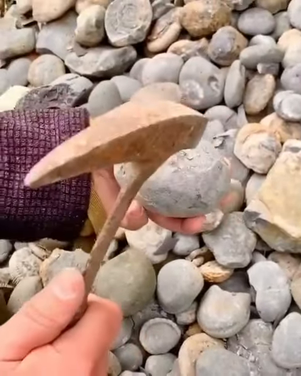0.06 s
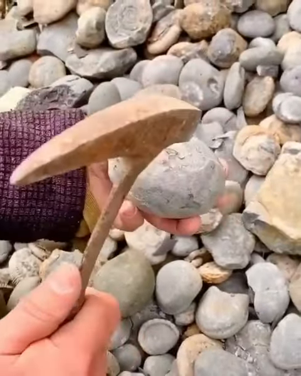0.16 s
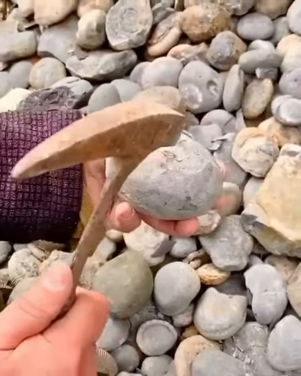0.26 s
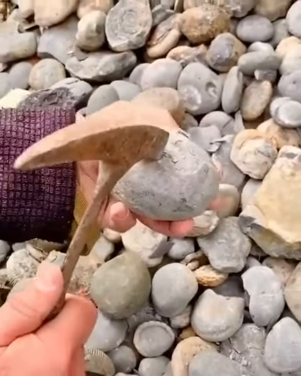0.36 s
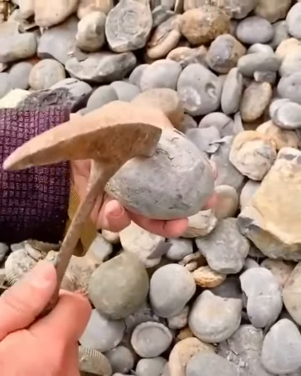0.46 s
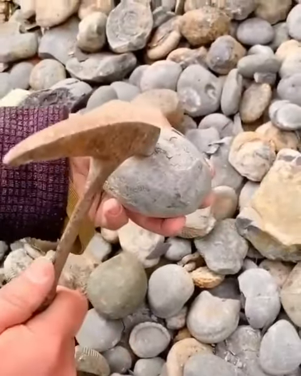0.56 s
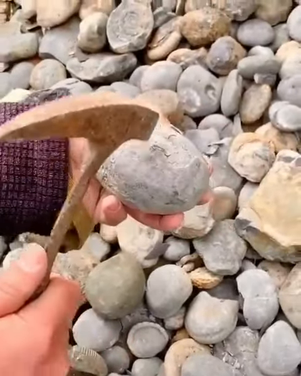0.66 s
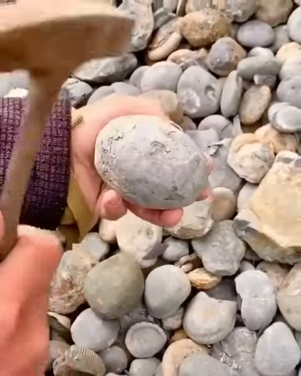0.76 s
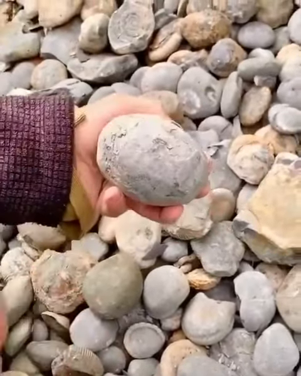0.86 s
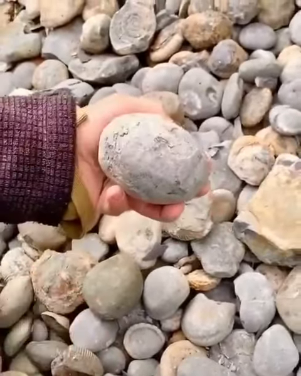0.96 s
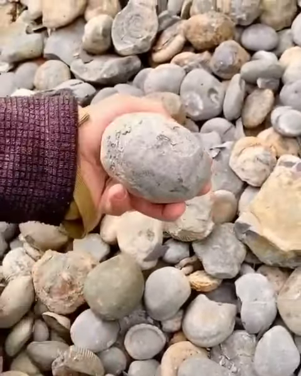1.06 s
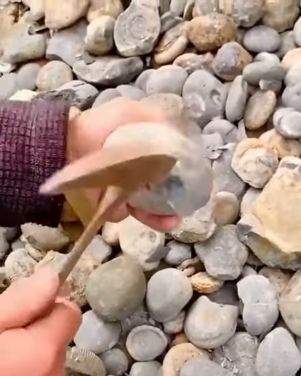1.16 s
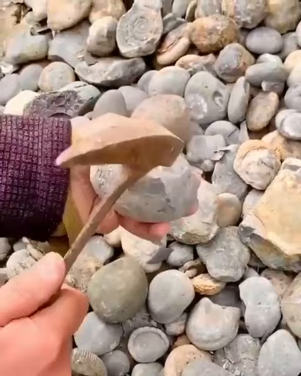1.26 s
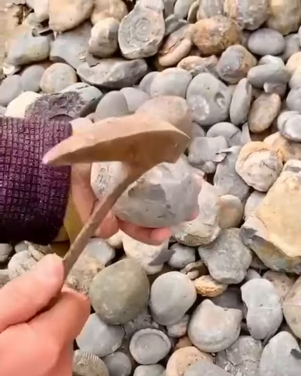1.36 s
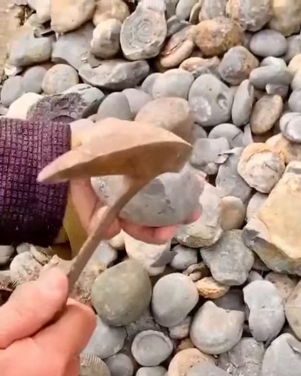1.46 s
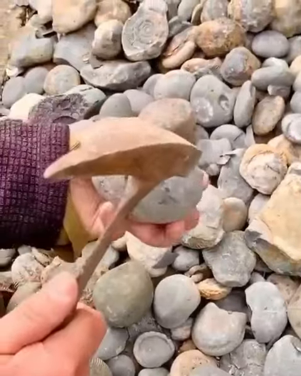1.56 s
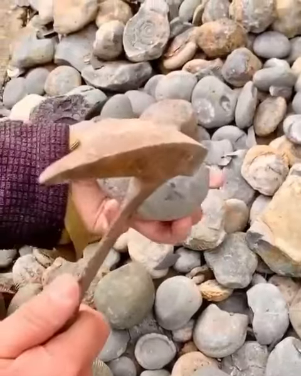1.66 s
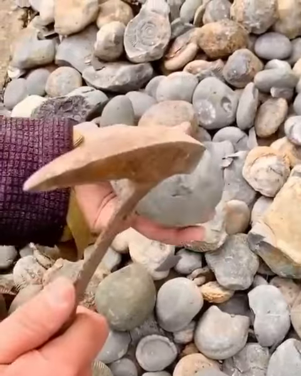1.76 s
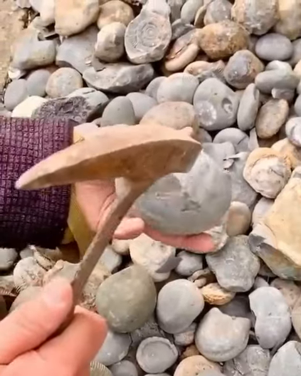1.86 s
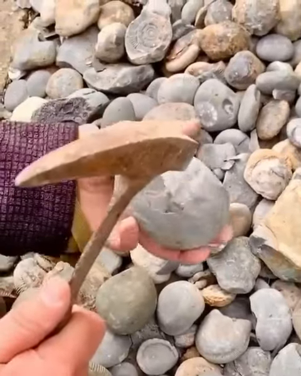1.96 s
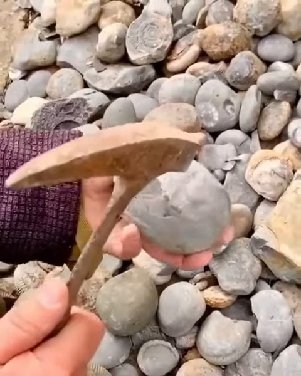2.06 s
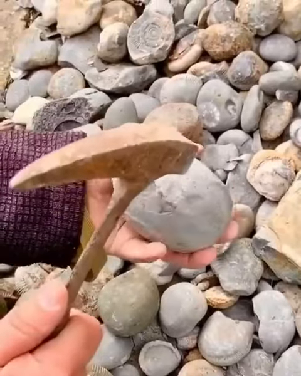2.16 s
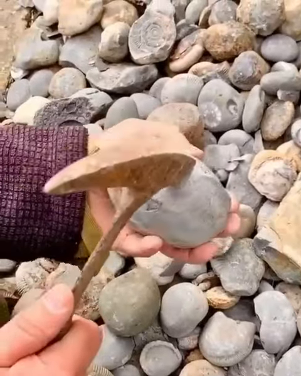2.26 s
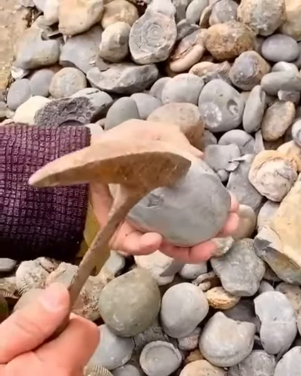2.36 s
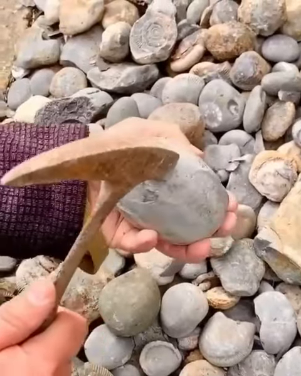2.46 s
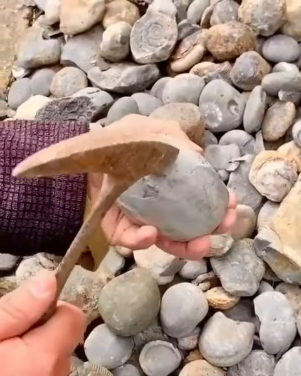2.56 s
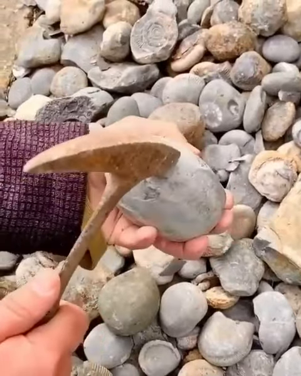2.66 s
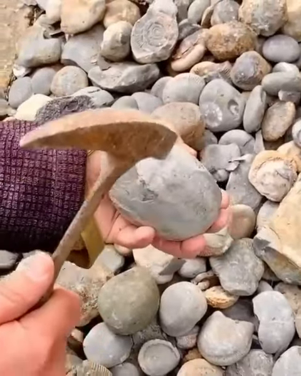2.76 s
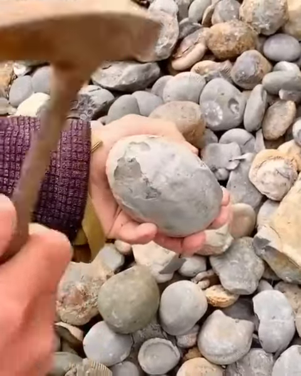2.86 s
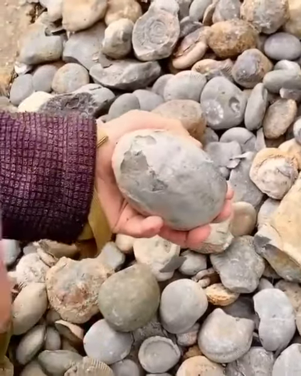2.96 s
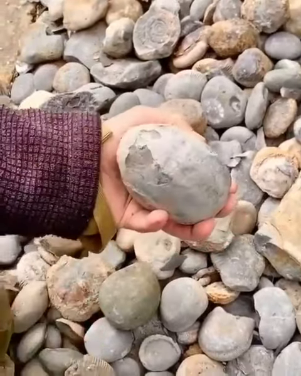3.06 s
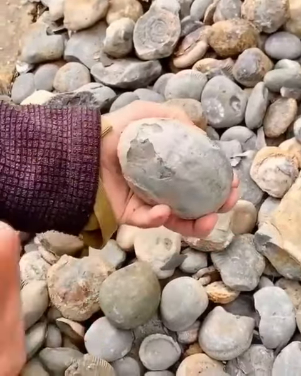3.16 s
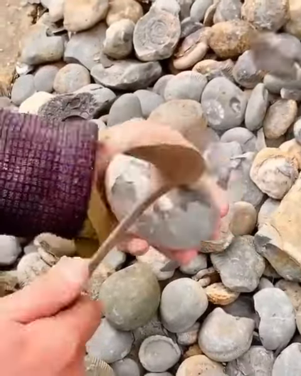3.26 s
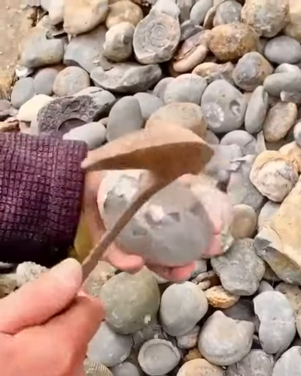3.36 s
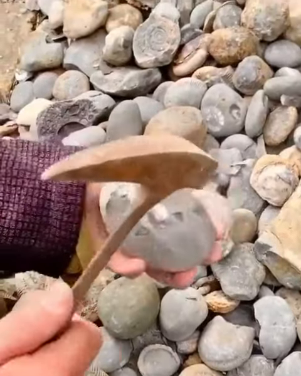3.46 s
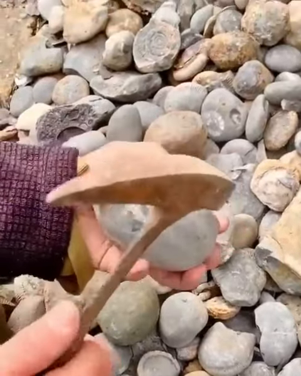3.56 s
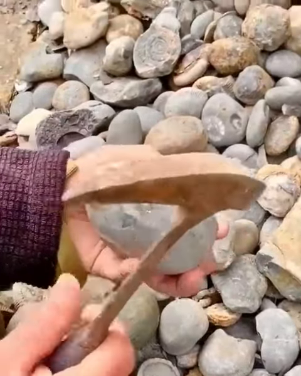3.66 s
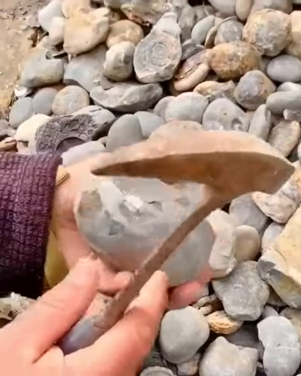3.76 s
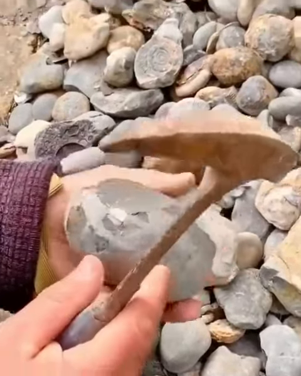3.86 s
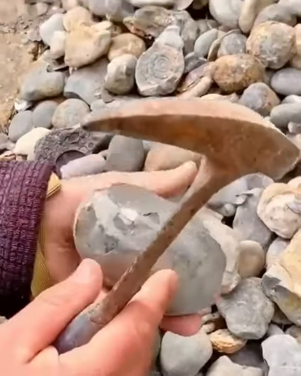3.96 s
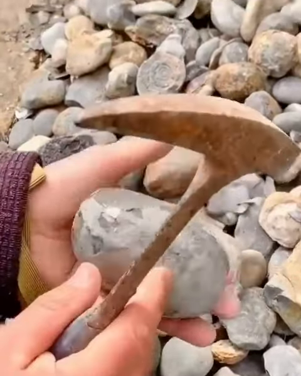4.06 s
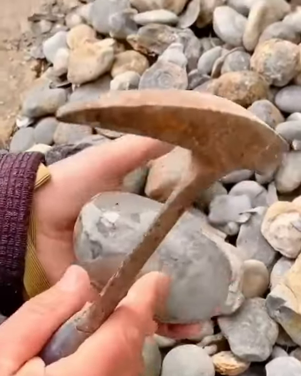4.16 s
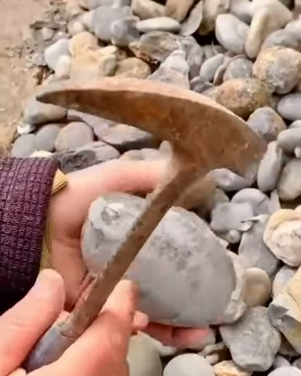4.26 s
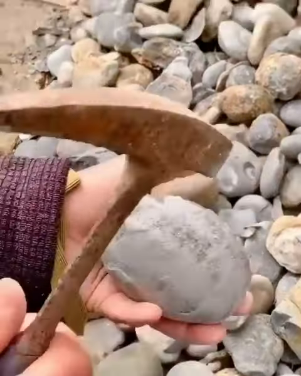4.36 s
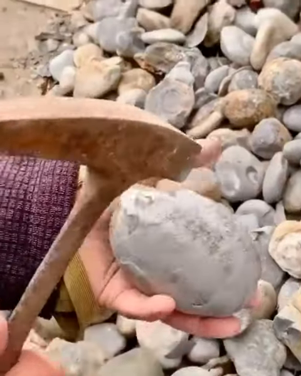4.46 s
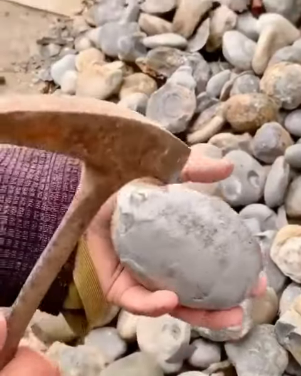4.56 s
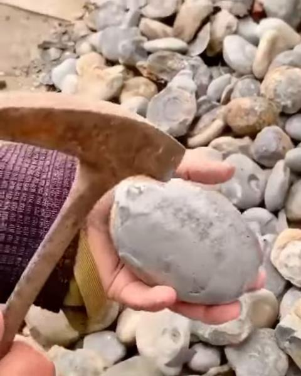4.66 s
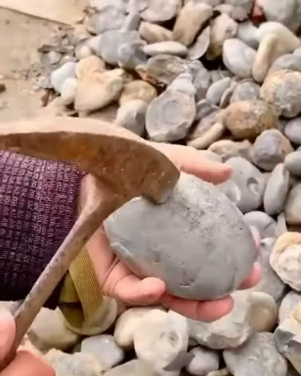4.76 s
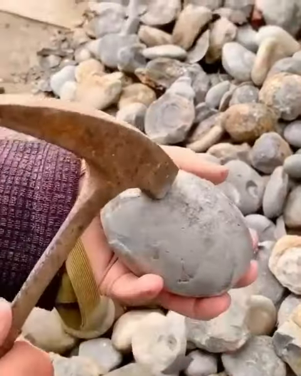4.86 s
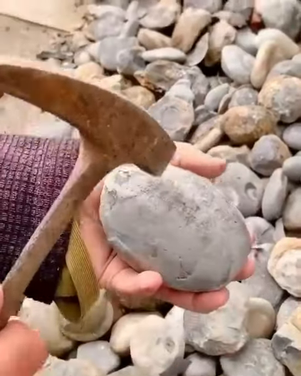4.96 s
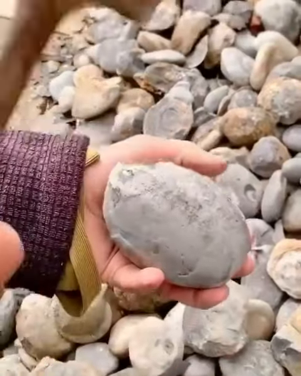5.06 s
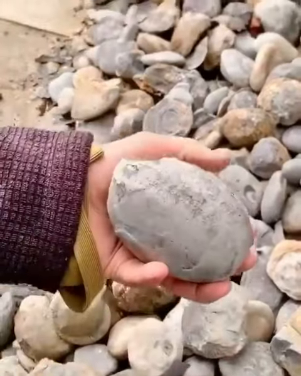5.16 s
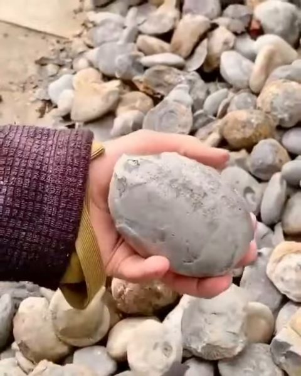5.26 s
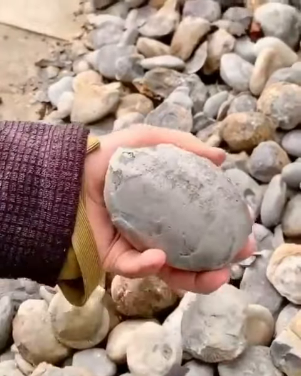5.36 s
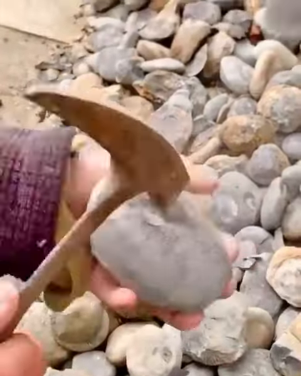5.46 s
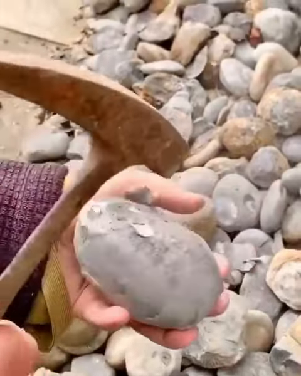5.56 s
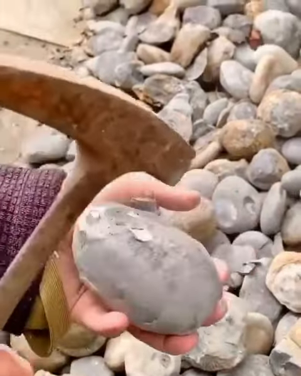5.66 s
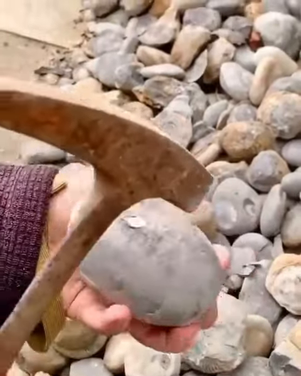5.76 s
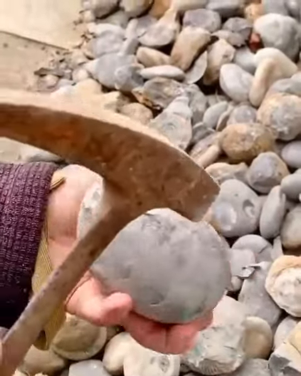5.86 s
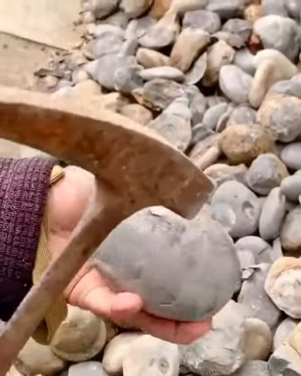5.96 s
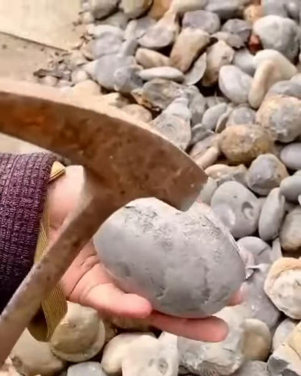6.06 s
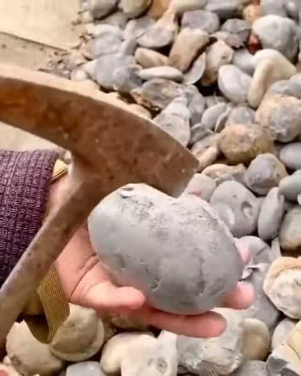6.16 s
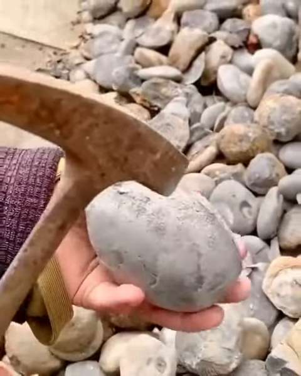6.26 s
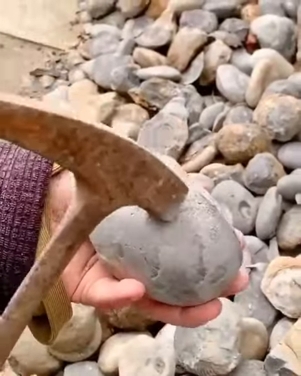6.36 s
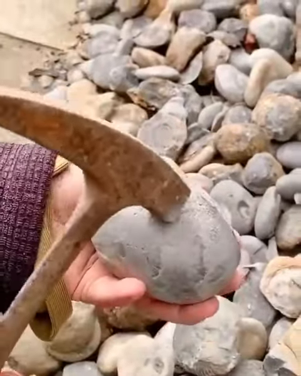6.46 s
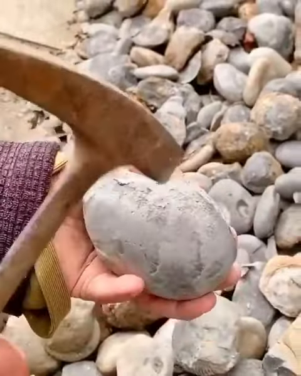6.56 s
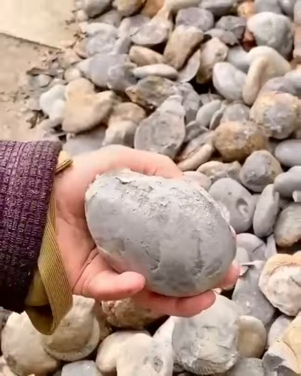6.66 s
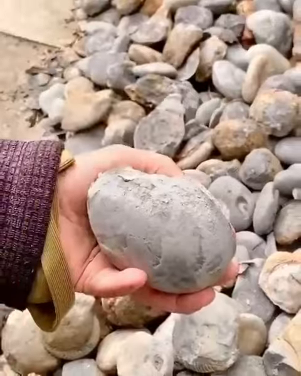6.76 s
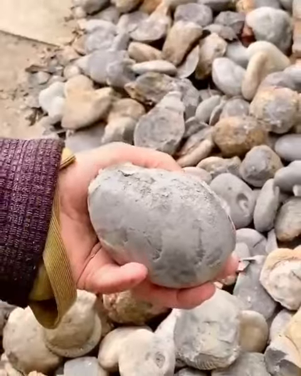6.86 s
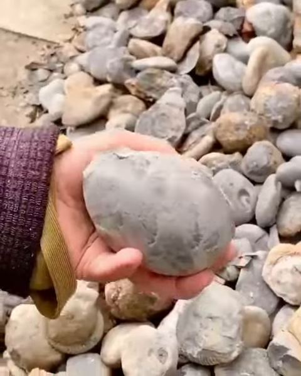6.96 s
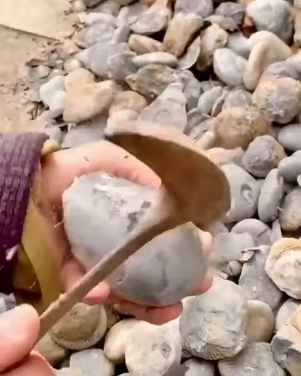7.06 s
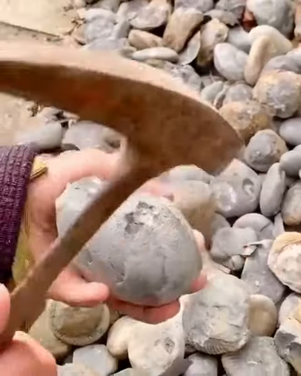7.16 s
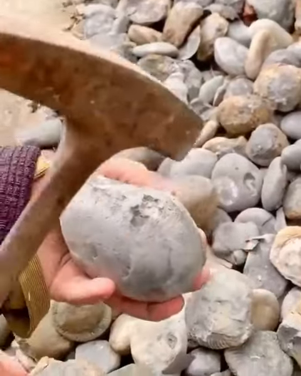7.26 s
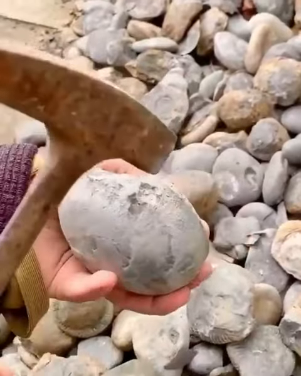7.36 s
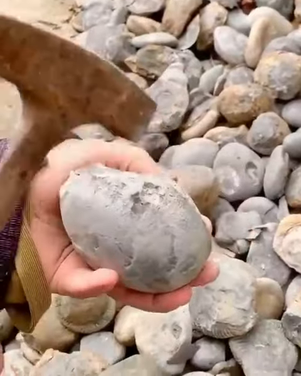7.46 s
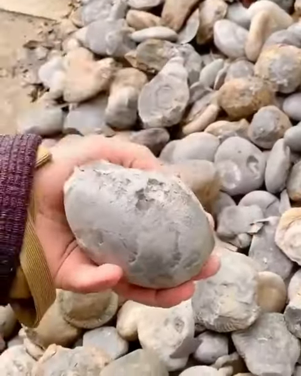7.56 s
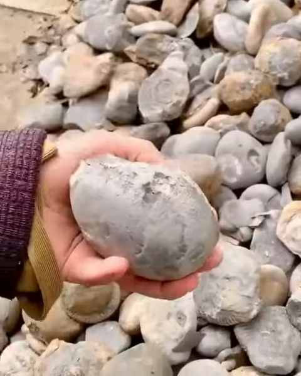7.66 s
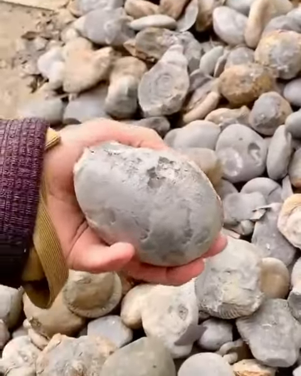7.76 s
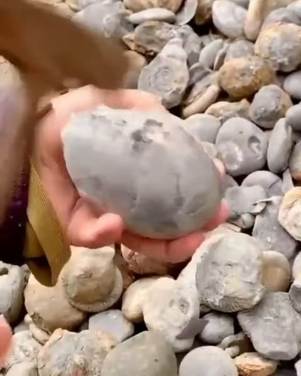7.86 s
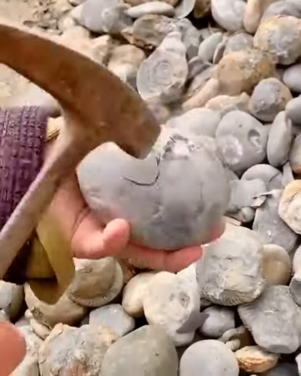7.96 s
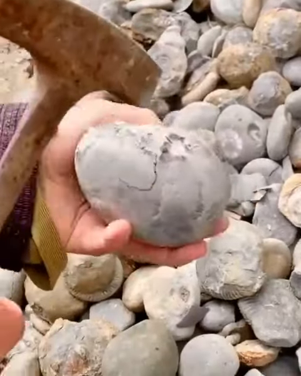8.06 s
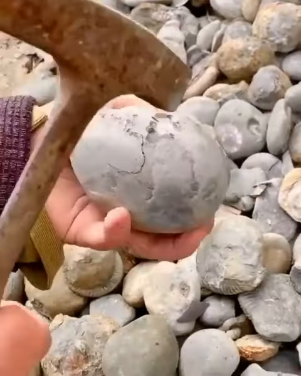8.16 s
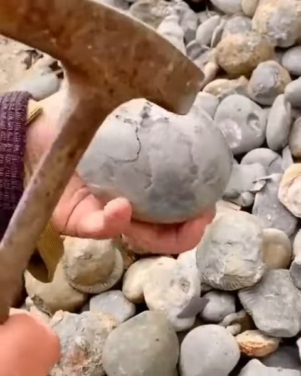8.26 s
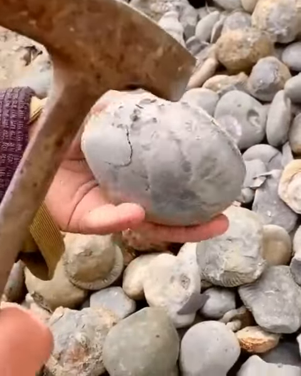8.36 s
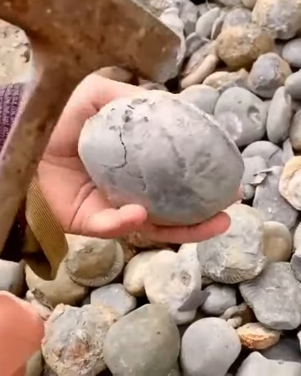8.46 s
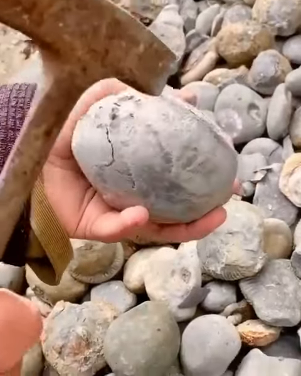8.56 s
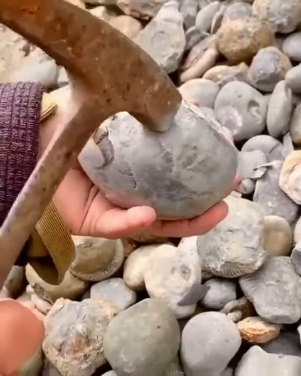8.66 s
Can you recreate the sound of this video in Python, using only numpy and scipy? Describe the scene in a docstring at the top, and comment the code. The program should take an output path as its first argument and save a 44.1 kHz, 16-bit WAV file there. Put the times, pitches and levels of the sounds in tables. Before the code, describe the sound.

A steel hammer strikes a hand-held stone in spaced, sharp dry knocks, with chips ticking onto pebbles over faint low wind rumble and distant surf.

```python
"""Hammering a stone on the beach

A steel pick hammer strikes a rounded stone held in one hand on a pebble beach, close to the microphone.
Taps and blows are damped rings for stone and steel, one slow pulse for the palm and noise grains for crushing.
Chips tick and coarse grit patters over the pebbles as noise bursts through short rings; the ground echoes.
Shaped noise makes rubbing fingers, gusts and far surf; a limiter turns loud blows down and recovers slowly."""
import sys
import numpy as np
from scipy import signal
from scipy.fft import rfft, irfft, next_fast_len
from scipy.io import wavfile
from scipy.ndimage import uniform_filter1d, minimum_filter1d

SR = 44100
rng = np.random.default_rng(int(sys.argv[2]) if len(sys.argv) > 2 else 0)


def transcribe(signal):
    """Save signal, clipped to [-1, 1], as a 16-bit WAV file at the path in sys.argv[1]."""
    frames = np.atleast_2d(signal).T
    limited = np.clip(frames, -1, 1)
    pcm = np.round(limited * 32767).astype(np.int16)
    wavfile.write(sys.argv[1], SR, pcm)


N = 383669  # length of the scene [samples]
TOP_HZ = 13600  # upper limit of the crushing noise and of the recorder

# Throughout, t60 is the time a sound takes to fall by 60 dB.


def undb(db):
    """Turn decibels into a gain."""
    return 10 ** (np.asarray(db) / 20)


def colour(x, points):
    """Filter by a spectrum of (frequency [Hz], level [dB]), keeping the power of white noise."""
    size = next_fast_len(2 * len(x))
    hz, db = np.transpose(points)
    bins_hz = np.linspace(1, SR / 2, size // 2 + 1)
    gain = undb(np.interp(np.log(bins_hz), np.log(hz), db))
    gain /= np.sqrt(np.mean(gain ** 2))
    return irfft(rfft(x, size) * gain, size)[:len(x)]


def fade(t, t60):
    """Exponential decay from t = 0, silent before."""
    return (t >= 0) * np.exp(-np.log(1000) * np.abs(t) / t60)


def ring(t, modes, tune=1):
    """Damped sines set off at t = 0, with all pitches multiplied by tune."""
    return sum(undb(db) * fade(t, t60) * np.sin(2 * np.pi * hz * tune * t) for hz, db, t60 in modes)


def grains(size, spread_db):
    """Noise made of dense grains of very unequal strength, rms 1."""
    x = rng.standard_normal(size) * undb(spread_db * rng.standard_normal(size))
    return x / x.std()


def wander(size, length=N):
    """Random values, each gliding to the next over size samples."""
    steps = np.repeat(rng.standard_normal(length // size + 1), size)
    return uniform_filter1d(steps, size)[:length]


def contact(t, rise_s, t60, clump_db, size=24):
    """Noise in short uneven clumps, rising briefly before its peak at t = 0, then dying away."""
    envelope = np.exp(np.minimum(t, 0) / rise_s) * (t < 0) + fade(t, t60)
    clumps = undb(clump_db * wander(size, len(t)))
    x = grains(len(t), spread_db=4) * clumps * envelope
    return x * np.linalg.norm(envelope) / np.linalg.norm(x)


def punch(x, size=176):
    """Scale a short sound so that its loudest moment has rms 1."""
    return x / np.sqrt(uniform_filter1d(x ** 2, size).max())


def swells(rows):
    """Smooth rises and falls of level, one for each row (time [s], level [dB], half length [s])."""
    t = np.arange(N) / SR
    return sum(undb(db) * np.exp(-np.minimum(((t - s) / length) ** 2, 20)) for s, db, length in rows)


def flicker(x, depth_db, size=1024):
    """Each narrow band of a sound changes level at random from moment to moment."""
    cells = signal.stft(x, nperseg=size)[2]
    walk = rng.standard_normal(cells.shape[1:])
    walk = uniform_filter1d(walk, 3, axis=0)  # neighbouring bands
    walk = uniform_filter1d(walk, 6, axis=1)  # neighbouring moments
    gain = undb(depth_db * walk / walk.std())
    gain /= np.sqrt(np.mean(gain ** 2))
    return signal.istft(cells * gain, nperseg=size)[1][:, :N]


def pan(x, left_db):
    """Place a sound by the level difference left minus right."""
    return x * undb(np.array([[left_db], [-left_db]]) / 2)


def widen(mid, wide, side):
    """Make stereo: add a second sound to the left channel and take it from the right."""
    return mid + side * wide * np.array([[1], [-1]])


def stereo_noise(points, side, spread_db=0):
    """Coloured noise, partly shared by both channels; a larger side makes it wider."""
    mid, wide = (colour(grains(N, spread_db), points) for _ in range(2))
    return widen(mid, wide, side)


def add(out, x, s):
    """Mix x into out from time s."""
    i = int(s * SR)
    out[:, i:i + x.shape[1]] += x[:, :N - i]


def background_gain():
    """The slowly changing background level, shared by the low rumble and the wash."""
    # background level over time, joined by straight lines: (time [s], level [dB])
    background_levels = [(0, -64.5), (0.19, -48), (1.22, -49.5), (1.6, -57), (3.2, -56), (4.5, -59),
                         (6.0, -53.5), (6.85, -53), (7.5, -56.5), (8.7, -57)]
    return undb(np.interp(np.arange(N) / SR, *np.transpose(background_levels)))


def wind(breeze_db=5.5, gust_db=-4.5, flutter_db=1.5, size=4400):
    """A fluttering breeze and its gusts press on the microphone as low rumbling noise."""
    # gusts, before gust_db is added: (time [s], level [dB], half length [s])
    gusts = [(0.19, -34, 0.051), (0.35, -31, 0.052), (0.6, -40.5, 0.13), (0.812, -26.5, 0.016),
             (1.92, -41.5, 0.032), (6.69, -38.5, 0.035), (6.94, -47, 0.043), (7.39, -51.5, 0.16),
             (7.7, -47.5, 0.02), (8.425, -37, 0.027)]
    # colour of the rumble: (frequency [Hz], level [dB])
    rumble_colour = [(20, -30), (35, -11.5), (55, 2.5), (75, 0.5), (110, -4.5), (170, -12.5), (300, -23),
                     (700, -55), (2000, -88)]
    flutter = undb(flutter_db * wander(size))
    breeze = undb(breeze_db) * background_gain() * flutter
    pressure = breeze + undb(gust_db) * swells(gusts)
    return pressure * stereo_noise(rumble_colour, side=0.24)


def surf(surf_db=-4.5):
    """A wide, fairly steady wash of noise from the far surf, with slight random changes in each band."""
    # colour of the wash: (frequency [Hz], level [dB])
    wash_colour = [(60, -2.5), (250, 2), (500, -1), (1000, 0), (1600, -4.5), (2000, -8.5), (2500, -14.5),
                   (4000, -23.5), (7000, -31), (12000, -36), (15000, -49.5)]
    wash = flicker(stereo_noise(wash_colour, side=0.8), depth_db=3.0)
    return undb(surf_db) * background_gain() * wash


def rubbing(size=260):
    """Gritty scrapes as the stone is turned and dust trickles off it in uneven clumps."""
    # fingers and grit rubbing on the stone: (time [s], level [dB], half length [s])
    rubs = [(0.267, -64, 0.018), (0.359, -58, 0.034), (1.083, -69, 0.022), (1.665, -63.5, 0.025),
            (2.267, -76, 0.053), (3.562, -52, 0.04), (3.755, -53.5, 0.047), (3.89, -64.5, 0.078),
            (4.035, -62.5, 0.061), (4.18, -73.5, 0.054), (5.76, -58.5, 0.053), (5.88, -62.5, 0.054),
            (6.164, -60, 0.045), (6.42, -66.5, 0.08), (7.335, -62, 0.026), (7.455, -68.5, 0.031),
            (7.775, -69.5, 0.011), (8.092, -48.5, 0.026)]
    # colour of the grit: (frequency [Hz], level [dB])
    grit_colour = [(1000, -14.5), (4000, -7.5), (6500, -5.5), (8500, -7.5), (10500, -3.5), (12500, -10.5),
                   (14000, -46)]
    clumps = undb(4.5 * wander(size))
    clumps /= np.sqrt(np.mean(clumps ** 2))
    grit = flicker(stereo_noise(grit_colour, side=0.6, spread_db=6), depth_db=4)
    return swells(rubs) * clumps * grit


def steel(t, tilt_db, size=80):
    """The head rings higher or lower with the spot that strikes, and roughly as it grinds on the grit."""
    # ways the hammer head rings, before tilt and chance: (frequency [Hz], level [dB], t60 [s])
    head_modes = [(2770, -4.5, 0.017), (3660, 8, 0.045), (3630, -8.5, 0.12), (3670, -21.5, 0.27),
                  (3820, -3.5, 0.021), (5082, -12, 0.064), (6500, -31, 0.06), (8070, -13.5, 0.085),
                  (8130, -18, 0.06), (10100, -31.5, 0.15), (11000, -24.5, 0.033)]
    spot_db, rough = 1.5, .65  # chance spread of levels; depth of the roughness
    pivot_hz = head_modes[1][0]  # the tilt leaves this pitch alone
    total = 0
    for hz, db, t60 in head_modes:
        level_db = db + tilt_db * np.log2(hz / pivot_hz) + spot_db * rng.standard_normal()
        total = total + ring(t, [(hz, level_db, t60)]) * (1 + rough * wander(size, len(t)))
    return total


def crumble(t, rise_s, t60, flake_hz, flake_db, dust_db, grit_db=-12, flake_t60=0.013, flake_left_db=-8):
    """Noise peaks with the blow, rings the contact and a breaking flake, and ends in a spray of dust."""
    # resonances of the crumbling contact, before a small chance shift of pitch:
    # (frequency [Hz], level [dB], t60 [s], left minus right [dB])
    contact_modes = [(390, -6.5, 0.0015, 1.5), (1060, -6, 0.006, 7), (1680, -12.5, 0.0082, 0),
                     (2321, -3, 0.0078, -7), (2520, 0.5, 0.0067, -11), (3110, -1, 0.015, -14),
                     (3670, -8.5, 0.007, -13.5), (4260, -5, 0.0042, -13), (5300, -14, 0.0079, -3),
                     (6000, -2.5, 0.0074, -5), (6660, -13, 0.019, -4), (8300, -20, 0.0033, 1),
                     (10133, -5.5, 0.013, 0.5), (11200, -14.5, 0.0057, -1.5), (12180, -15, 0.024, 0)]
    # colour of the crushed grit: (frequency [Hz], level [dB])
    crush_colour = [(150, -12), (600, -6.5), (1400, -18.5), (2500, -2), (4800, 2.5), (6800, -5.5),
                    (8900, -23.5), (10300, -13.5), (14000, -24.5)]
    # colour of the dust thrown off: (frequency [Hz], level [dB])
    spray_colour = [(200, -13.5), (1000, -8.5), (2600, 4.5), (3700, -1.5), (5000, -8.5), (9000, -15.5),
                    (14000, -30.5)]
    dust_t60 = 0.29  # time the dust takes to settle [s]

    fractures = contact(t, rise_s, t60, clump_db=4.5)
    after = t[t >= 0]
    response = pan(ring(after, [(flake_hz, flake_db, flake_t60)]), flake_left_db)
    for hz, db, decay, left_db in contact_modes:
        # every blow lands on another spot, which shifts each resonance a little
        tune = 1 + .02 * rng.standard_normal()
        response = response + pan(ring(after, [(hz, db, decay)], tune), left_db)
    rasp = signal.fftconvolve(fractures[None], response, axes=1)[:, :len(t)]
    rasp *= np.linalg.norm(fractures) / np.linalg.norm(rasp.mean(axis=0))

    mid, wide = (colour(contact(t, rise_s, t60, clump_db=3), crush_colour) for _ in range(2))
    grit = widen(mid, wide, side=.5)

    dust = grains(len(t), spread_db=6) * undb(3 * wander(size=130, length=len(t)))
    spray = colour(dust, spray_colour) * fade(t, dust_t60)
    return rasp + undb(grit_db) * grit + undb(dust_db) * spray


def blow(db, contact_s, ring_db, tilt_db, thump_db, crush_db, crumble_t60, flake_hz, flake_db, dust_db,
         thump_hz=290, thump_lag=.003, crush_lead=0.00082):
    """One blow: the surface crumbles, the stone knocks and drives into the palm, the steel rings on."""
    # stone in the cupped hand, before the grip retunes it: (frequency [Hz], level [dB], t60 [s])
    stone_modes = [(410, 3.5, 0.01), (1085, 3.5, 0.0066), (1800, 1.5, 0.0076), (2130, -1.5, 0.0094),
                   (2360, -6, 0.011)]
    # rise of the noise before the peak of a 0 dB blow [s], and the step in level that doubles it
    zero_rise_s, rise_doubling_db = 0.0035, 32.5
    # upper edge of a 0 dB crunch, and the drop in level that lowers it by an octave
    crunch_top_hz, crunch_db_per_octave = 14500, 52.5

    t = np.arange(-SR // 20, SR // 3) / SR
    # the air feels the change of force; a longer contact gives a duller knock
    force = np.exp(-.5 * (np.arange(-64, 65) / SR / contact_s) ** 2)
    grip = 1 + .02 * rng.standard_normal()
    knock = -np.convolve(ring(t, stone_modes, grip), np.gradient(force), "same")
    knock /= np.abs(knock).max()
    # the whole stone is pushed and stopped: one slow swing of pressure
    swing = 2 * np.pi * thump_hz * (t - thump_lag)
    thump = -swing * np.exp(-swing ** 2 / 2)
    body = knock + undb(thump_db) * thump

    # a louder blow has a longer rise
    rise_s = zero_rise_s * 2 ** (db / rise_doubling_db)
    crush = crumble(t + crush_lead, rise_s, crumble_t60, flake_hz, flake_db, dust_db)
    # a gentle touch grinds more dully than a hard one
    top_hz = min(crunch_top_hz * 2 ** ((db + crush_db) / crunch_db_per_octave), TOP_HZ)
    crush = signal.sosfilt(signal.butter(4, top_hz, "low", fs=SR, output="sos"), crush)

    ringing = undb(ring_db) * steel(t, tilt_db)
    return undb(db) * (pan(body, 0.77) + pan(ringing, -4.5) + undb(crush_db) * crush)


def hammer(lowest_hz=135):
    """All blows and rebounds; the microphone passes little bass from the strikes."""
    # hammer on stone; all levels after the first are relative to the blow's own level:
    # (time [s], level [dB], contact time [s], steel ring [dB], ring tilt [dB per octave],
    #  palm thump [dB], crushing [dB], crumbling t60 [s], pitch of the flake that breaks off [Hz],
    #  its ring within the crushing [dB], dust within the crushing [dB])
    blows = [(0.5196, -3.5, 0.00013, -47.5, -35, -24, -31.5, 0.072, 2260, 21, -19),
             (1.2943, 16.5, 0.000054, -56, 1, -4.5, -10.5, 0.012, 2360, 13, -38),
             (1.3306, -14, 0.00016, -31, 16.5, -27, -38, 0.022, 2295, -1, -32),
             (2.4290, -11.5, 0.00011, -55, 15, -20, -28.5, 0.014, 2280, 7, -18),
             (2.461, -25.5, 0.00017, -48, 0, -14, -30, 0.034, 2290, -4, -14),
             (2.637, -34.5, 0.00022, -55, -3, -3, -32, 0.023, 2310, 2, -24),
             (3.369, 5, 0.00018, -41, 0, -6, -10, 0.025, 2490, -13, -27.5),
             (3.4002, -20.5, 0.000054, -23, 10, -27, -6, 0.028, 2550, 6.5, -23),
             (4.895, -3.5, 0.000069, -28, -11, -17, -22, 0.014, 2200, -12, -31),
             (4.919, -32, 0.00023, -33.5, 24.5, -26, -44, 0.047, 2300, -3, -22),
             (5.5751, 0, 0.000036, -19.5, 8, 0.5, 0, 0.027, 2700, 0, -29),
             (6.4927, -7.5, 0.000099, -39.5, -17, -28, -30.5, 0.0092, 2120, 8, -32),
             (6.5187, -18, 0.00013, -29, -4, -17, -26, 0.092, 2090, 9, -32.5),
             (7.1621, 7.5, 0.000054, -23, -7, -8.5, -14, 0.012, 2500, 8, -31.5),
             (8.0229, -22, 0.00011, -25, -0.5, -13, -12.5, 0.013, 2700, 9, -26),
             (8.0341, 1.5, 0.000053, -20.5, 10.5, 0.5, -5.5, 0.011, 2720, 7.5, -36.5),
             (8.095, -27.5, 0.00024, -26.5, -2, -14, -14, 0.021, 2680, -3, -23)]
    out = np.zeros((2, N))
    for s, *stroke in blows:
        add(out, blow(*stroke), s - 1 / 20)  # each blow lands 1/20 s into its sound
    return signal.sosfilt(signal.butter(2, lowest_hz, "high", fs=SR, output="sos"), out)


def pebbles(x, echo_db=-15, side=1.0):
    """The stony ground scatters a short, diffuse echo: noise that dies away quickly."""
    # colour of the echo: (frequency [Hz], level [dB])
    scatter_colour = [(100, -12.5), (400, -8.5), (1000, -2), (2400, -8), (4000, -1.5), (8000, -5.5),
                      (14000, -11)]
    t = np.arange(SR // 5) / SR
    envelope = fade(t - .002, .085)
    envelope /= np.linalg.norm(envelope)
    mid, wide = (colour(rng.standard_normal(len(t)), scatter_colour) * envelope for _ in range(2))
    response = widen(mid, wide, side)
    return undb(echo_db) * signal.fftconvolve(x, response, axes=1)[:, :N]


def crumbs(count=8):
    """Small chips land at random through each shower, ever sparser and weaker."""
    # showers after crushing blows: (start time [s], starting level [dB], length [s])
    showers = [(1.5, -55.5, 0.19), (3.55, -56, 0.44), (5.797, -56.5, 0.66)]
    middle_hz, t60, clack_db, snap_db = 7100, 0.005, -25, 0
    fade_db = 17  # drop in level from the start of a shower to its end
    rows = []
    for start, db, length in showers:
        for late, small in rng.random((count, 2)):
            s = start + length * late ** 2
            hz = middle_hz * 2 ** (small - .5)
            rows.append((s, db - fade_db * late, hz, t60, clack_db, snap_db))
    return rows


def chips(ring_db=3, size_spread=0.037, spot_db=4):
    """Each chip's noise rises over a few milliseconds to a dry crack, rings and clacks the pebble beneath."""
    # larger chips landing on the pebbles: (time [s], level [dB], pitch [Hz], chatter t60 [s],
    # clack of the pebble beneath [dB], first snap over the chatter [dB])
    large_chips = [(1.4572, -26, 7040, 0.0042, -29, -6), (1.47, -52.5, 7600, 0.018, -20, -12),
                   (1.51, -53, 9700, 0.05, -13.5, -11.5), (1.537, -38, 11000, 0.027, -21, -7.5),
                   (1.5674, -53.5, 7500, 0.011, -14, -6), (1.574, -46.5, 10700, 0.054, -19, -8),
                   (3.533, -31.5, 8000, 0.0096, -2.5, -4.5), (3.5415, -37, 10500, 0.012, -12, -4),
                   (3.547, -41, 5500, 0.034, -2, -6), (3.588, -62, 6600, 0.022, -14, -6),
                   (3.62, -47.5, 10200, 0.013, -16, 0), (3.649, -43, 3600, 0.012, -14, -2),
                   (3.665, -43, 9000, 0.014, -28, -5), (3.6692, -34.5, 5200, 0.012, -12, -3),
                   (3.71, -45, 4700, 0.022, -28, -2), (3.737, -46, 4465, 0.06, -24, -13.5),
                   (3.8313, -38.5, 3900, 0.056, -8.5, -3), (4.043, -57, 8500, 0.036, -23, -9.5),
                   (5.7872, -49.5, 8000, 0.029, -19.5, -8), (5.814, -51, 10800, 0.022, -23, -5.5),
                   (5.835, -26, 5200, 0.038, -18, -1.5), (5.844, -48.5, 9000, 0.012, 2, -9.5),
                   (6.112, -48.5, 6500, 0.021, 0, -3.5), (6.116, -47.5, 3330, 0.12, 6, -4),
                   (6.277, -48.5, 6140, 0.015, -4, -7), (6.323, -41, 7760, 0.058, -6.5, -5),
                   (7.338, -67.5, 7540, 0.016, -12, -13), (7.919, -45.5, 8020, 0.0059, -25, 1)]
    # resonances shared by all the chip ticks, each varied by chance: (frequency [Hz], level [dB], t60 [s])
    tick_modes = [(2640, 3.5, 0.0066), (3620, 5, 0.0045), (4360, 4, 0.0052), (5950, -3, 0.0057),
                  (6530, 1.5, 0.0078), (7000, -4.5, 0.007), (9720, -2, 0.011), (11260, -6.5, 0.01),
                  (12500, -7.5, 0.012)]
    # pebble bedded among others, before its size retunes it: (frequency [Hz], level [dB], t60 [s])
    pebble_modes = [(301, 8, 0.0075), (700, 5.5, 0.0023), (1140, 11, 0.0081), (1940, 13.5, 0.0073)]
    # colour of the ticks as the microphone hears them: (frequency [Hz], level [dB])
    tick_colour = [(300, -9), (1000, 7.5), (3500, 0.5), (7200, -1), (8400, -26), (9300, -6), (10000, 3.5),
                   (12200, -2.5), (14000, -2)]
    # each tick is favoured around its own pitch: (multiple of that pitch, level [dB])
    pitch_band = [(0.101, -26), (0.4, -9.5), (0.7, -1.5), (1.05, 2), (2.2, -2), (4.001, -10)]
    rise_s = 0.0024  # rise time before the snap

    out, t = np.zeros((2, N)), np.arange(SR // 8) / SR
    short = t[:SR // 40]
    for s, db, hz, t60, clack_db, snap_db in large_chips + crumbs():
        # the snap comes 1/50 s into the sound
        chatter, second_chatter = (contact(t - 1 / 50, rise_s, t60, clump_db=4) for _ in range(2))
        snap = undb(snap_db) * signal.unit_impulse(len(t), SR // 50)
        chatter, second_chatter = (x + snap * np.linalg.norm(x) for x in (chatter, second_chatter))
        # every chip has its own shape and lands on another spot
        modes = [(f * (1 + size_spread * rng.standard_normal()), gain + spot_db * rng.standard_normal(), decay)
                 for f, gain, decay in tick_modes]
        pebble_size = 2 ** (.2 * rng.standard_normal())
        ringing = signal.fftconvolve(ring(short, modes), second_chatter)[:len(t)]
        clack = signal.fftconvolve(ring(short, pebble_modes, 1 / pebble_size), chatter)[:len(t)]
        tick = punch(colour(chatter, tick_colour)) + undb(ring_db) * punch(ringing)
        tick = colour(tick, [(multiple * hz, gain) for multiple, gain in pitch_band])
        sound = punch(tick) + undb(clack_db) * punch(clack)
        add(out, pan(undb(db) * sound, rng.standard_normal()), s - 1 / 50)
    return out


def regrip():
    """A dull bump of low noise as the hand takes a new grip."""
    # bumps: (time [s], level [dB], half length [s])
    bumps = [(2.375, -36, 0.014)]
    # their colour: (frequency [Hz], level [dB])
    bump_colour = [(40, -27), (100, 2), (165, 1), (260, -16), (600, -40), (2000, -80)]
    return swells(bumps) * stereo_noise(bump_colour, side=0.16)


def spills(rise_s=0.022):
    """Coarse grit patters down over the pebbles in uneven clumps and comes to rest."""
    # grit spilling behind the chips: (time [s], level [dB], t60 [s])
    grit_spills = [(3.55, -54, 0.069), (3.735, -52.5, 0.077), (5.847, -48.5, 0.26), (6.126, -66, 0.49)]
    # its colour: (frequency [Hz], level [dB])
    spill_colour = [(500, 7), (1500, -9.5), (2500, 1), (3800, 1.5), (6500, 0.5), (8700, -29),
                    (10500, -20.5), (12500, -11.5), (14000, -30)]
    out, t = np.zeros((2, N)), np.arange(-SR // 20, SR // 3) / SR
    for s, db, t60 in grit_spills:
        patter = colour(contact(t, rise_s, t60, clump_db=5, size=130), spill_colour)
        patter = undb(db) * punch(patter, size=880)
        add(out, pan(patter, rng.standard_normal()), s - 1 / 20)
    return out


def scene():
    """Hammer, chips and spilling grit with their ground echo, handling and the open beach."""
    beach = wind() + surf()
    handling = rubbing() + regrip()
    strikes = hammer() + chips() + spills()
    return strikes + pebbles(strikes, echo_db=-18.5) + handling + beach


def release(over_db, hold_s=0.073, fall_db_per_s=99):
    """Follow rises at once, hold, then let go at a steady rate."""
    hold = 2 * int(hold_s * SR / 2) + 1
    held = -minimum_filter1d(-over_db, hold, origin=hold // 2)
    ramp = fall_db_per_s * np.arange(N) / SR
    return np.maximum.accumulate(held + ramp) - ramp


def record(dry, size=530):
    """A look-ahead limiter senses the power of the blows, holds them and recovers slowly; the top is cut."""
    threshold_db, ratio = -18.5, 5.1
    power = uniform_filter1d(np.mean(dry ** 2, axis=0), size)
    power_db = 10 * np.log10(np.abs(power) + 1e-12)
    over_db = np.maximum(power_db - threshold_db, 0) * (1 - 1 / ratio)
    # the centred window looks ahead, so the level is already down when a blow arrives
    gain_db = minimum_filter1d(-release(over_db), 3 * size)
    limited = dry * undb(uniform_filter1d(gain_db, size))
    return signal.sosfilt(signal.ellip(8, .2, 70, TOP_HZ, fs=SR, output="sos"), limited)


dry = scene()
out = record(dry)
transcribe(out)
```